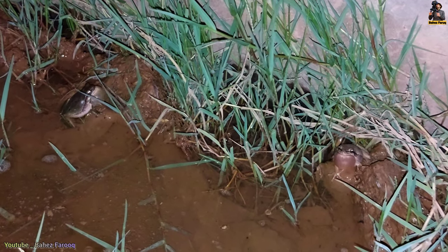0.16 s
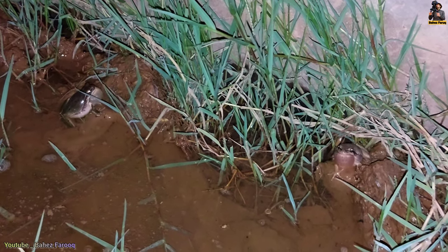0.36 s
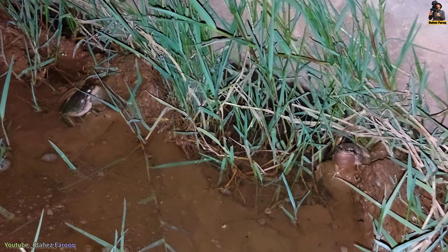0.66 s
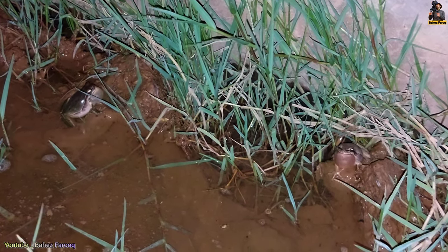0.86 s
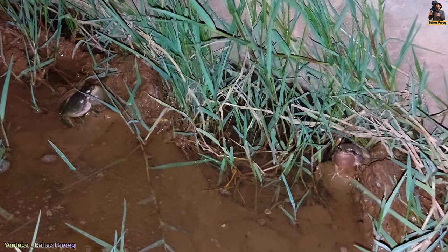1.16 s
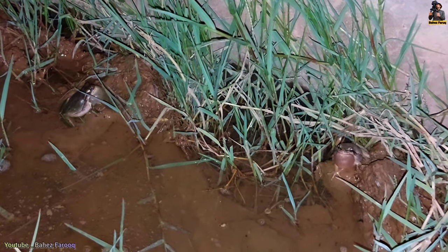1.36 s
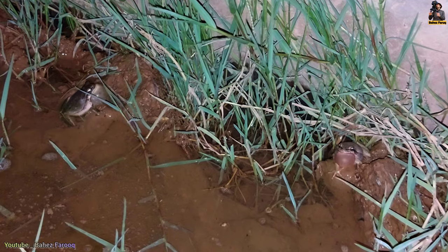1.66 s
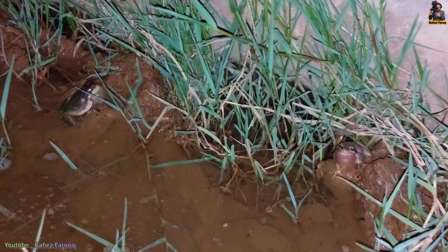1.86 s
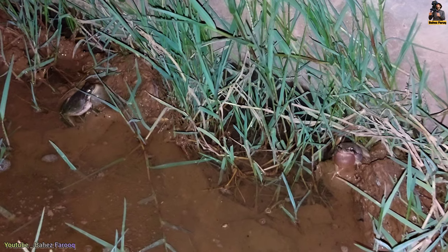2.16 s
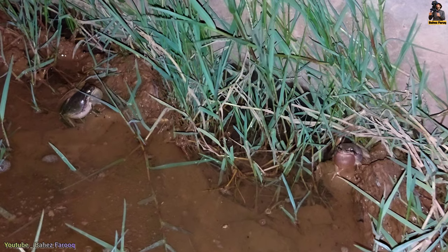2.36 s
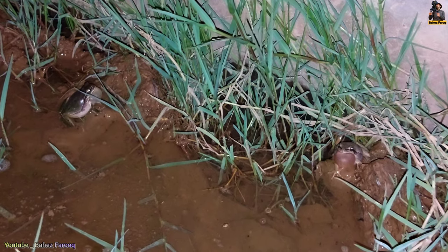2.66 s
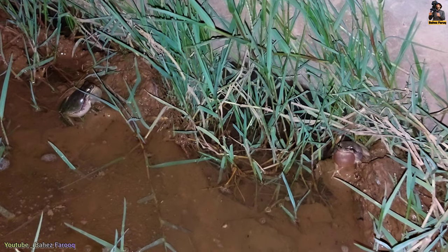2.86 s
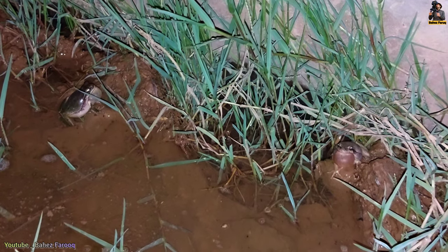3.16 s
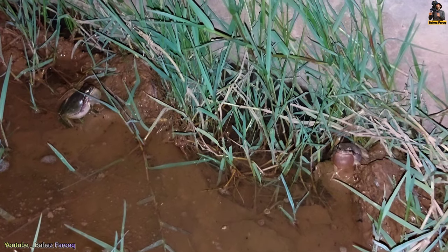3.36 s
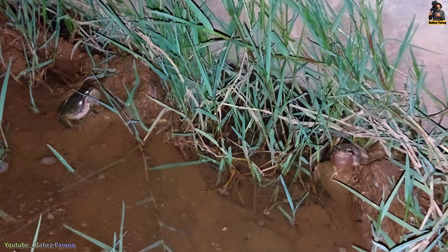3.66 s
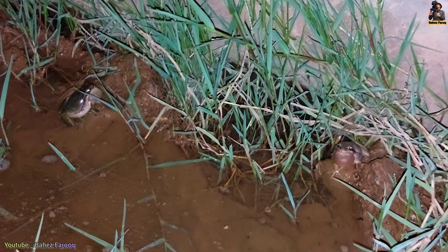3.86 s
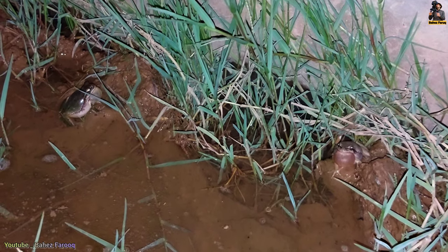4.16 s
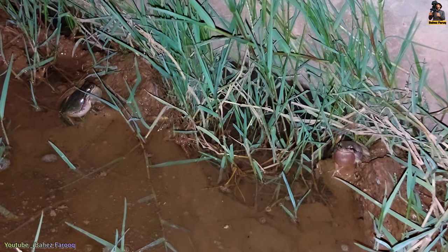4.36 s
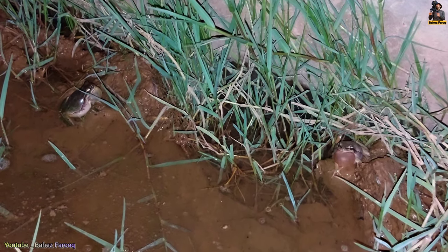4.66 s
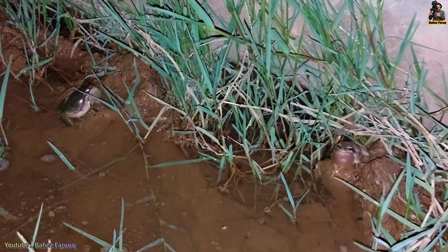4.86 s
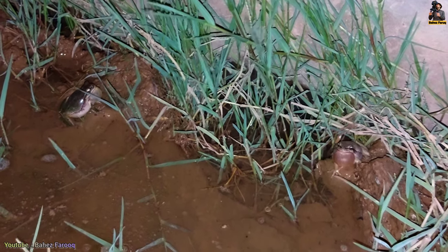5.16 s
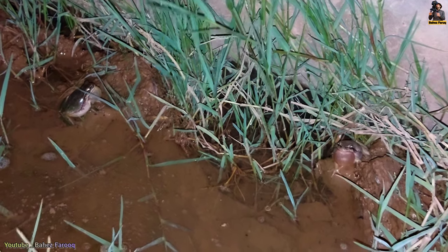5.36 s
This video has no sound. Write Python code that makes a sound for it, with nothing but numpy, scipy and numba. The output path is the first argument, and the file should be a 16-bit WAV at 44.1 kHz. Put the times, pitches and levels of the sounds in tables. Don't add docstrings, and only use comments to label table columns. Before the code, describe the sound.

Fast pulsed frog beeps sound close by, then stop, leaving distant replies and rough rattling trills over fluttering wind at a puddle.

```python
import sys
import numpy as np
from scipy import signal
from scipy.fft import rfft, irfft, next_fast_len
from scipy.io import wavfile
from scipy.ndimage import uniform_filter1d, minimum_filter1d
from numba import njit

SR = 44100
rng = np.random.default_rng(int(sys.argv[2]) if len(sys.argv) > 2 else 0)


def pcm_store(signal):
    levels = np.round(np.clip(np.atleast_2d(signal), -1, 1) * 32767)
    wavfile.write(sys.argv[1], SR, levels.astype(np.int16).T)


def attenuation_scalar(level_db):
    decades = np.asarray(level_db, float) / 20
    return 10 ** decades


N = 242991

# start_s, throat_db, throat_hz
TRILL = [(0.631, -28.5, 2340), (0.664, -30.5, 2420), (0.709, -33, 2398), (0.773, -27, 2410),
         (0.834, -26, 2280), (0.891, -28.5, 2189), (0.935, -34.5, 2060), (0.987, -33, 1900),
         (1.019, -52.5, 1790), (1.982, -28.5, 2308), (2.001, -31.5, 2314), (2.038, -28, 2220),
         (2.097, -27.5, 2388), (2.158, -30, 2410), (2.211, -27.5, 2360), (2.265, -27.5, 2240),
         (2.311, -31.5, 1950), (2.354, -32, 1842), (2.386, -31, 1900), (3.058, -56, 2047),
         (3.084, -47, 2334), (3.108, -30.5, 2323), (3.129, -27, 2324), (3.148, -27.5, 2251),
         (3.187, -29.5, 1803), (3.244, -26.5, 1950), (3.306, -24, 2153), (3.367, -24.5, 2197),
         (3.422, -25, 2130), (3.469, -26.5, 1975), (3.502, -34, 1916), (3.535, -62, 1894)]
# start_s, throat_db, throat_hz
CLOSE_TRILL = [(4.249, -16, 2401), (4.286, -15.5, 2542), (4.339, -13, 2595), (4.401, -14.5, 2619),
               (4.461, -16, 2639), (4.515, -15, 2600), (4.573, -16.5, 2278), (4.626, -20, 1946),
               (4.665, -21.5, 1896), (4.76, -40.5, 2066), (4.799, -38, 2068), (4.846, -39, 2002),
               (4.887, -41.5, 2088), (4.926, -63, 1940), (5.322, -19, 2438), (5.348, -16, 2513),
               (5.396, -14, 2611), (5.451, -13.5, 2600), (5.504, -32, 2525)]
# frequency_hz,
# left_minus_right_db
TRILL_SHADOW = [(400, 2), (700, 1.5), (1300, -3), (2400, -8), (4400, -16), (5200, -18), (6000, -36),
                (15000, -30)]
# frequency_hz, gain_db
BEEP_ECHO = [(800, -19.5), (1200, 21.5), (2900, 8), (4500, -1.5), (7000, 6)]


def spread(points, hz):
    at, db = np.transpose(points)
    return attenuation_scalar(np.interp(np.log(hz + 1), np.log(at), db))


def colour(x, points, lead_s=0.):
    size = next_fast_len(N + 4096)
    hz = np.arange(size // 2 + 1) * SR / size
    response = spread(points, hz) * np.exp(2j * np.pi * hz * lead_s)
    return irfft(rfft(x, size) * response, size)[..., :N]


def unit(x):
    return x / np.sqrt(np.mean(x ** 2, axis=-1, keepdims=True))


def ring(x, hz, width_hz):
    b, a = signal.iirpeak(hz, hz / (1.55 * width_hz), SR)
    return signal.lfilter(b, a, signal.lfilter(b, a, x))


def walk(rate):
    k = int(SR / rate)
    held = np.repeat(rng.standard_normal((2, N // k + 1)), k, axis=1)
    return uniform_filter1d(held, k)[:, :N]


def scatter(x, t60, late_s, late_db):
    t = np.arange(int(.3 * SR)) / SR
    grass = attenuation_scalar(-60 * t / t60) * (t > .002)
    bank = attenuation_scalar(late_db) * np.exp(-((t - late_s) / 0.031) ** 2)
    tail = rng.standard_normal((2, len(t))) * (grass + bank)
    return signal.fftconvolve(x[None], tail / np.sqrt(np.sum(tail ** 2) / 2), axes=1)[:, :N]


def ports(x, wet, shadow, lead_s):
    return np.array([colour(x + wet[0], shadow, lead_s), x + wet[1]])


def add(out, at_s, x):
    i = int(at_s * SR)
    x, i = x[max(-i, 0):], max(i, 0)
    out[i:i + len(x)] += x[:len(out) - i]


def breathy(x, db):
    # frequency_hz, gain_db
    breath = [(700, -30.5), (1000, -15.5), (1800, -10), (3500, -14.5), (5000, -3), (7500, 1), (8300, -23.5),
              (20000, -69)]
    air = unit(colour(rng.standard_normal(N), breath))
    return x + attenuation_scalar(db) * uniform_filter1d(np.abs(x), size=45) * air


def note(first, last, count, db, hz0, hz1, partials, jitter_s, scatter_db, waver, fresh=1):
    chance = rng.standard_normal((3, count + 4, 1))
    k = np.arange(-2, count + 2)[:, None]
    along = k / max(count - 1, 1)

    start = np.maximum(k, -1.15) / max(count - 1, 1) * (last - first)
    start = start - fresh * .0015 * np.exp(-np.maximum(k, 0) / 1.3) + jitter_s * chance[0] + .015

    swell_db = -np.minimum(12 * np.exp(-k / .95), 27) * fresh - 4 * (k == 0) * fresh
    swell_db = swell_db - 60 * (1 - fresh) * (k < 0) - 7 * (k == -2)
    swell_db = swell_db - np.minimum(8 * np.exp(-(count - 1 - k) / .5), 19) - 2 * along
    swell_db = swell_db + scatter_db * chance[1]

    climb = 1 + (hz0 / hz1 - 1) * 1.1 * np.abs(1 - along) ** 2.4
    climb = climb + np.where(k < 0, -.2 - .56 * (k + 1), -.04 * np.exp(-k / 1.2))
    climb = climb + .08 * (k >= count) * chance[1] + waver * chance[2]
    quick = 1 - fresh * 0.14 * np.exp(-np.maximum(k, 0) / 2.5)

    t = np.maximum(np.arange(int((last - first + .04) * SR)) / SR - start, 0)
    x = t / .0019
    onset = np.tanh(x) ** 2
    puff = (x * np.exp(1 - x)) ** 3.6 + attenuation_scalar(-17) * onset * np.exp(-t / .004)
    rise_s, fall_s = .0019, .0027
    main = np.clip(np.minimum(t / rise_s, 1 - (t - rise_s) / fall_s), 0, 1)
    main = main + attenuation_scalar(-24) * onset * np.exp(-t / .0045)

    multiples = np.transpose(partials)[0]
    unsteady = np.where(np.abs(multiples - 1) < .04, 1, 2)[:, None, None]
    turn = 2 * np.pi * rng.random((len(partials), 1, 1))
    turn = turn + 60 * waver * unsteady * rng.standard_normal((len(partials), count + 4, 1))
    turn = turn + 2 * np.pi * .26 * k * (along - 1)
    loose = 1 + waver * rng.standard_normal(turn.shape)

    total = 0
    for (m, g_db, sharp, follow), phase, stray in zip(partials, turn, loose):
        level = attenuation_scalar(swell_db * (0.34 if m < .9 else 1))
        shape = (main if abs(m - 1) < .04 else puff) ** sharp
        bend = (quick if 2.2 < m < 2.8 else climb) ** follow
        slack = stray if m < .9 or 1.1 < m < 2.2 else 1
        tone = np.sin(2 * np.pi * m * hz1 * bend * slack * t + phase)
        total = total + attenuation_scalar(g_db) * np.sum(level * shape * tone, axis=0)
    return attenuation_scalar(db) * total


def neighbours():
    # start_s, end_s, peak_db, end_pitch_hz, top_partial_db
    answers = [(-.03, 0.03, -39, 2880, -7), (0.056, 0.135, -34.5, 2900, -13.5),
               (0.585, 0.65, -32.5, 2890, 1), (1.048, 1.135, -32, 2830, -1), (1.267, 1.35, -41, 2722, -8),
               (1.766, 1.845, -35, 2790, 3), (1.999, 2.08, -40.5, 2805, -2), (2.246, 2.32, -50, 2560, -11),
               (2.644, 2.735, -40.5, 2850, -0.5), (2.777, 2.845, -32.5, 2820, -3),
               (2.839, 2.88, -43.5, 2770, -8), (2.901, 2.99, -38.5, 2800, -1),
               (3.055, 3.11, -41.5, 2550, -6), (3.326, 3.4, -31.5, 2800, -2.5), (3.433, 3.5, -35, 2900, -4),
               (3.565, 3.64, -32.5, 2753, 4), (3.647, 3.73, -60.5, 2870, 10),
               (3.752, 3.82, -37.5, 2820, -12), (3.824, 3.91, -27.5, 2840, 2.5),
               (3.936, 4.02, -33, 2785, 5.5), (4.054, 4.13, -21, 2830, 2.5), (4.126, 4.21, -29.5, 2860, -2),
               (4.296, 4.38, -18.5, 2900, -7.5), (4.472, 4.53, -20.5, 2980, -4),
               (5.36, 5.44, -23, 2900, -1), (4.68, 4.78, -23.5, 2875, 0), (4.826, 4.9, -28.5, 2860, 1),
               (4.913, 4.985, -21.5, 2823, 0), (4.979, 5.04, -30, 2835, -11),
               (5.063, 5.145, -26.5, 2886, 0.5), (5.163, 5.24, -22, 2820, 0),
               (5.242, 5.285, -28.5, 2840, -10)]
    # multiple_of_end_pitch, level_db, pulse_sharpness, share_of_climb
    far_sac = [(0.358, -32, 0.7, 0.84), (0.452, -46.5, 1.5, 1.7), (.56, -32, 0.68, 1.6),
               (0.921, -11.5, 0.45, 0.9), (1.001, 1, 1.1, 1.06), (1.252, -20.5, 0.42, 1.2),
               (1.498, -30, 0.42, 0.23), (2.0, -37.5, 1.8, 2.1), (2.502, -29, 0.53, 0.95)]
    # frequency_hz, left_minus_right_db
    far_shadow = [(700, 4), (1300, -2), (2000, -8.5), (2800, -10.5), (4400, -25.5), (8000, -32.5),
                  (15000, -32.5)]
    out = np.zeros(N)
    for first, last, db, hz, top_db in answers:
        sac = [(m, g_db + top_db * (m > 1.9), sharp, follow) for m, g_db, sharp, follow in far_sac]
        count = round((last - first) * 178)
        call = note(first, last, count, db, 0.941 * hz, hz, sac, .0004, 2.2, .014)
        add(out, first - .020, call)
    out = breathy(out, -34)
    wet = attenuation_scalar(-5.5) * scatter(out, 0.11, .055, -39.5)
    return ports(out, colour(wet, BEEP_ECHO), far_shadow, 1 / SR)


def wind():
    # time_s, level_db
    breeze = [(0, -46.5), (.5, -45.5), (.9, -51), (1.05, -49), (2.5, -49), (2.6, -59), (2.9, -57.5),
              (3.5, -54.5), (3.64, -55), (3.74, -55), (3.8, -39.5), (5.51, -39.5)]
    # middle_s, level_db, half_length_s, left_minus_right_db
    gusts = [(.0, -28.5, 0.044, -45), (0.158, -31.5, 0.072, -11), (0.33, -28, 0.038, -63),
             (0.412, -39.5, 0.056, -33), (0.74, -41, 0.026, -31), (1.016, -39.5, 0.016, -37),
             (1.16, -47, 0.033, -31), (1.392, -40.5, 0.17, -33), (1.534, -40.5, 0.037, 4.5),
             (1.688, -38.5, 0.11, -12.5), (1.912, -43, 0.033, -11), (2.054, -35, 0.022, -22),
             (2.251, -42, 0.13, -28.5), (2.438, -30.5, 0.059, -34.5), (2.914, -48, 0.034, -22),
             (3.111, -48.5, 0.13, -23), (3.255, -51, 0.041, -13), (3.43, -46.5, 0.034, -5.5),
             (3.845, -34.5, 0.045, -47), (3.907, -26, 0.11, -34), (4.021, -26.5, 0.028, -2),
             (4.313, -29.5, 0.021, -16), (4.415, -44, 0.027, -8), (4.634, -30, 0.033, -11.5),
             (4.857, -29, 0.0061, -20), (5.128, -55.5, 0.036, 7.5), (5.373, -30.5, 0.045, -8)]
    # frequency_hz, gain_db
    rumble_tone = [(20, -45.5), (45, 6.5), (75, 9.5), (130, 6.5), (200, -4.5), (300, -50), (600, -87.5)]
    # frequency_hz, gain_db
    flutter_tone = [(60, -69.5), (150, 5), (230, 4.5), (350, -1), (500, -14.5), (800, -30), (1500, -85)]
    t = np.arange(N) / SR
    air = attenuation_scalar(np.interp(t, *np.transpose(breeze)) + np.array([[-5.5], [0]]))
    for s, db, half, pan_db in gusts:
        i = slice(max(int((s - .2) * SR), 0), int((s + .2) * SR))
        air[:, i] += attenuation_scalar(db + np.array([[pan_db], [0]])) * np.exp(-((t[i] - s) / half) ** 2)
    air = air * attenuation_scalar(1)
    rumble = unit(colour(rng.standard_normal((2, N)), rumble_tone)) * attenuation_scalar(2.2 * walk(20))
    flutter = unit(colour(rng.standard_normal((2, N)), flutter_tone)) * attenuation_scalar(5.9 * walk(44) - 4)
    return rumble * air + flutter * air ** 1.301


def loudness(x):
    return np.abs(uniform_filter1d(np.abs(x[1]), int(0.051 * SR)))


def night(near, far, trill):
    # frequency_hz, density_db_per_hz
    night_tone = [(180, -47), (300, 11), (620, -32.5), (985, 3), (1720, 2.5), (2730, 19), (3180, -21),
                  (5900, -12), (7320, -35.5), (12000, -24), (15600, -35), (22000, -120)]
    # frequency_hz, gain_db
    haze_tone = [(800, -22.5), (1000, 12.5), (4500, 10), (7300, -9.5), (8200, -4), (9000, -33),
                 (16000, -42)]
    hiss = unit(colour(rng.standard_normal((2, N)), night_tone)) * attenuation_scalar(-71.5 + 2.0 * walk(11.0))
    stir = attenuation_scalar(-43) * loudness(near) + attenuation_scalar(-33.5) * loudness(far)
    stir = stir + attenuation_scalar(-36.5) * loudness(trill) ** 0.94
    haze = unit(colour(rng.standard_normal((2, N)), haze_tone)) * stir * attenuation_scalar(2.0 * walk(12))
    left, right = (hiss + haze) * attenuation_scalar(13.0)
    return np.array([colour(left, TRILL_SHADOW), right])


def phone_hiss():
    # time_s, level_db
    hiss_level = [
        (3.55, -91),
        (3.85, -80),
    ]
    # frequency_hz, gain_db
    hiss_tone = [(7500, -3.5), (8500, 2.5), (9300, 12.5), (10200, 2.5), (15500, -0.5), (16000, -36.5)]
    db = np.interp(np.arange(N) / SR, *np.transpose(hiss_level))
    hiss = unit(colour(rng.standard_normal((2, N)), hiss_tone))
    return hiss * attenuation_scalar(db + np.array([[-12], [0]]))


def near_frog():
    # first_pulse_s, last_pulse_s, pulse_count, start_pitch_hz, end_pitch_hz
    beeps = [(0.1511, 0.2265, 14, 2730, 2910), (0.4013, 0.4906, 17, 2760, 2970),
             (0.6613, 0.7452, 16, 2770, 2960), (0.9025, 0.9864, 16, 2750, 2970),
             (1.1551, 1.2339, 15, 2750, 2940), (1.3761, 1.4614, 16, 2760, 2940),
             (1.5682, 1.6163, 10, 2700, 2850), (1.6224, 1.6738, 10, 2900, 2960),
             (1.863, 1.9401, 14, 2720, 2900), (2.1097, 2.189, 15, 2680, 2920),
             (2.4868, 2.5578, 13, 2750, 2900)]
    # multiple_of_end_pitch, level_db, pulse_sharpness, share_of_climb
    near_sac = [(0.413, -37.5, 0.27, 0.71), (0.524, -28, 0.38, 1), (0.622, -32.5, 0.4, 1.3),
                (1.001, 4.5, 1.165, 0.73), (1.219, -16.5, 1.5, 0.28), (1.465, -26.5, 0.36, 0.92),
                (2.001, -35, 1.7, 0.31), (2.421, -27, 0.51, 0.91)]
    fold = [(3.95, -56, .8, .6), (10.7, -50, .7, .9), (10.1, -50, .7, .9)]
    # first_pulse_s, last_pulse_s, pulse_count, level_db, start_pitch_hz,
    # end_pitch_hz
    croak = (1.565, 1.613, 10, -22, 1120, 1225)
    croak_sac = [(.89, -8.5, 0.27, .1), (4.6, -12, 1, 1), (6.95, -23, 1.5, 0.75)]
    # frequency_hz, left_minus_right_db
    near_shadow = [(700, -13), (1300, -8.5), (2400, -9), (2900, -15), (4400, -22), (8000, -42.5),
                   (15000, -27)]
    calls = []
    for first, last, count, hz0, hz1 in beeps:
        db = -3.5 - 2 * (count < 12)
        calls.append(((first, last, count, db, hz0, hz1), near_sac + fold))
    calls.append((croak, croak_sac))
    out = np.zeros(N)
    for (first, last, count, db, hz0, hz1), sac in calls:
        fresh = hz0 < 2850
        call = note(first, last, round(count), db, hz0, hz1, sac, .00008, .6, .004, fresh)
        add(out, first - .0169, call)
    out = breathy(out, -33)
    wet = attenuation_scalar(-22) * scatter(out, .1, .058, -17)
    return ports(out, colour(wet, BEEP_ECHO), near_shadow, 2 / SR)


@njit
def glide(x, hz, width_hz):
    y, b, l = np.empty(len(x)), 0., 0.
    for i in range(len(x)):
        g, k = np.tan(np.pi * hz[i] / SR), width_hz / hz[i]
        v = (b + g * (x[i] - l)) / (1 + g * (g + k))
        b, l, y[i] = 2 * v - b, l + 2 * g * v, k * v
    return y


def bursts():
    s, throat_db, hz = np.transpose(TRILL + CLOSE_TRILL)
    gap = np.diff(s, prepend=0, append=N / SR + 1)
    age = s - np.maximum.accumulate(np.where(gap[:-1] > .085, s, 0))
    chest_db = throat_db - 12 - 19.5 * np.log2(hz / 2400)
    sizzle_from_s = .125
    sizzle_db = throat_db + np.where(age > sizzle_from_s, -49 + 57 * (age - sizzle_from_s), -80)
    length = np.minimum(0.44 * gap[1:], 0.014)
    return zip(s, chest_db, throat_db, hz, length, sizzle_db)


def trill_frog():
    # centre_hz, width_hz, level_db
    chest_rings = [
        (467.3, 44, -3),
        (886, 244, 1.5),
    ]
    # centre_hz, width_hz, level_db
    mouth_rings = [(1476, 86, -24.5), (2900, 560, -0.5), (3302, 285, -6.5), (3624, 336, -10.5),
                   (4300, 300, -13.5), (4627, 140, -21), (6300, 490, -14)]
    # centre_hz, width_hz, level_db
    rasp_rings = [(8350, 900, 0.5), (10470, 710, -2), (12400, 1800, -11.5)]
    # frequency_hz, gain_db
    skin = [(5050, -1.5), (5400, -15.5), (7200, -19), (8200, -31.5), (20000, -82.5)]
    # frequency_hz, gain_db
    trill_echo = [(500, -5), (1100, 6), (2000, 8), (5000, 3)]

    at_s, _, pitch_hz = np.transpose(TRILL + CLOSE_TRILL)
    pitch_hz = np.interp(np.arange(N) / SR, at_s + .014, pitch_hz)
    clicks_hz = pitch_hz / 7 * (1 + .07 * walk(350)[0])
    beats = np.flatnonzero(np.diff(np.floor(np.cumsum(clicks_hz / SR))))
    folds = 0.06 * rng.standard_normal(N)
    folds[beats] += 1.9 * attenuation_scalar(3 * rng.standard_normal(len(beats)))

    chest = unit(sum(attenuation_scalar(db) * unit(ring(folds, hz, w)) for hz, w, db in chest_rings))
    mouth = sum(attenuation_scalar(db) * unit(ring(folds, hz, w)) for hz, w, db in mouth_rings)
    whistle = unit(ring(folds + 0.19 * rng.standard_normal(N), 4850, 120))
    throat_width_hz = 1.55 * 190
    voice = glide(glide(folds, pitch_hz, throat_width_hz), pitch_hz, throat_width_hz)
    rasp = sum(attenuation_scalar(db) * unit(ring(ring(folds, hz, w), hz, w)) for hz, w, db in rasp_rings)
    sizzle = unit(ring(ring(folds, 15400, 800), 15400, 800))

    out, top = np.zeros((2, N))
    for s, chest_db, throat_db, throat_hz, length, sizzle_db in bursts():
        i = int((s - .006) * SR)
        span = slice(i, min(i + int(.1 * SR), N))
        t = np.arange(span.stop - i) / SR
        attack_s, hold_s, release_s = 0.0098, 0.023, 0.015
        effort = np.clip(t / attack_s, 0, 1) * np.clip((length + hold_s - t) / release_s, 0, 1)
        linger = np.maximum(effort, attenuation_scalar(-9.5) * np.clip(t / .012, 0, 1) * np.exp(-t / 0.048))
        open_db = -3 + 7 * np.log2(throat_hz / 2400) + 0.059 * (throat_db + 16)
        head = linger * unit(voice[span])
        head = head + attenuation_scalar(open_db) * linger ** 1.09 * mouth[span]
        head = head + attenuation_scalar(open_db - 17) * linger ** 0.77 * whistle[span]
        out[span] += attenuation_scalar(chest_db - 4.5) * effort * chest[span]
        out[span] += attenuation_scalar(throat_db + 3.0) * head
        top[span] += effort * attenuation_scalar(2.2 * throat_db - 24) * rasp[span]
        top[span] += effort * attenuation_scalar(sizzle_db + 1) * sizzle[span]
    out = colour(out, skin) + top
    wet = attenuation_scalar(-9) * scatter(out, .1, .05, -22)
    return ports(out, colour(wet, trill_echo), TRILL_SHADOW, 13 / SR)


def scene():
    frogs = near_frog(), neighbours(), trill_frog()
    return sum(frogs) + wind() + night(*frogs) + phone_hiss()


def low_pass(x):
    return signal.sosfilt(signal.butter(12, 16650, fs=SR, output="sos"), x)


def record(dry):
    # frequency_hz, gain_db
    mic = [(7600, 0), (8500, -8), (9300, -14), (10200, 0), (15700, 0), (16000, -50)]
    leak = colour(dry ** 2, [(60, -38.0), (170, -21.0), (370, -20.0), (550, -27.5), (900, -55.5)])
    x = colour(dry + leak, mic)
    room_left = np.minimum(1, .99 / (np.abs(x) + 1e-9))
    gain = uniform_filter1d(minimum_filter1d(room_left, size=91), size=91)
    return low_pass(x * gain)


dry = scene()
out = record(dry)
pcm_store(out)
```